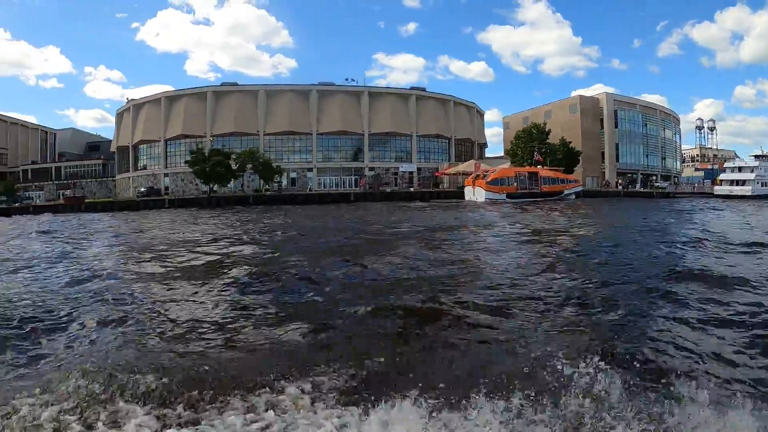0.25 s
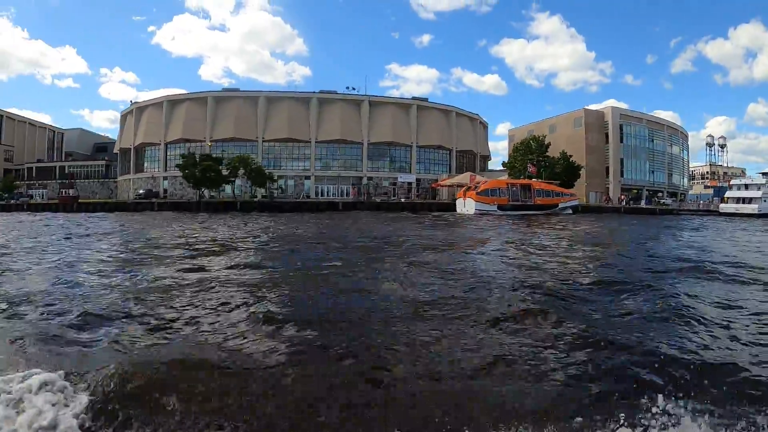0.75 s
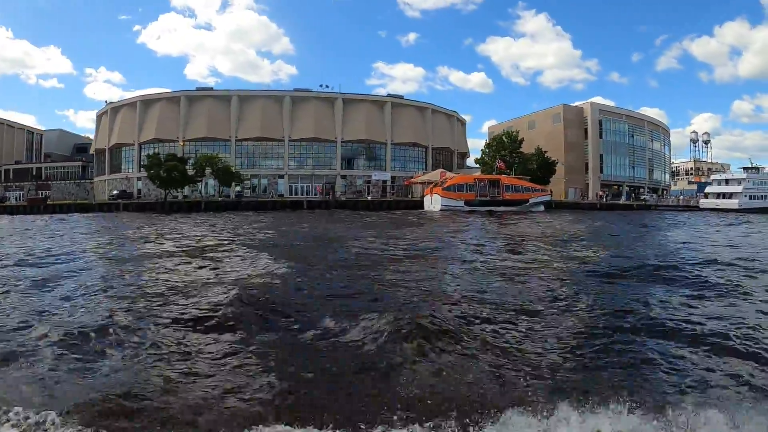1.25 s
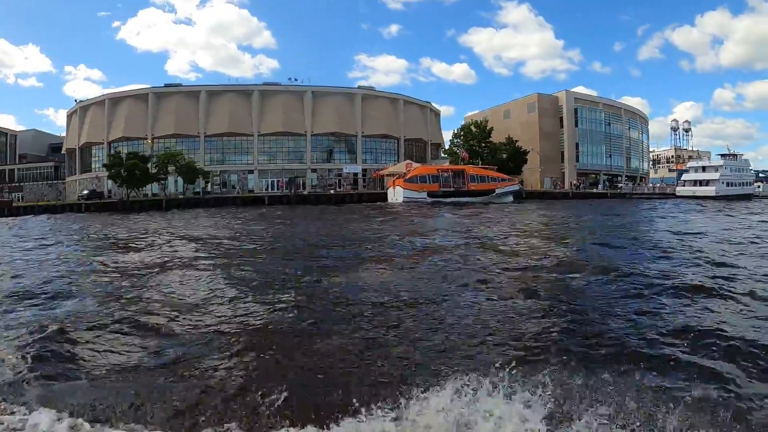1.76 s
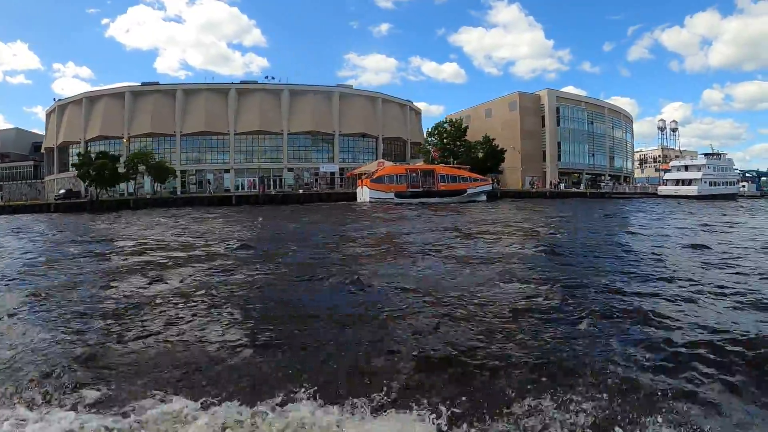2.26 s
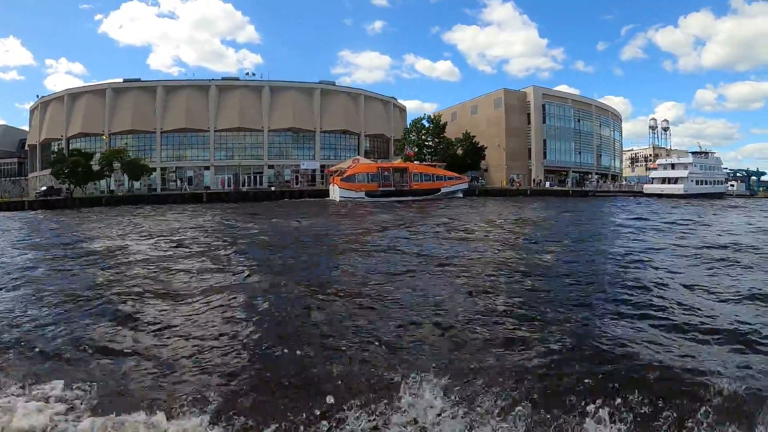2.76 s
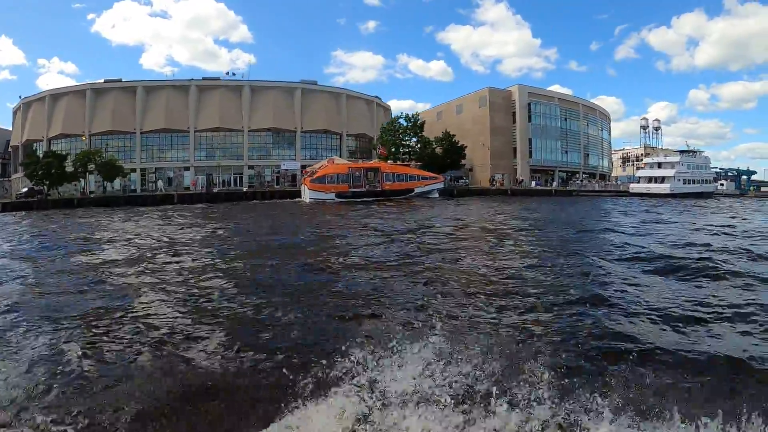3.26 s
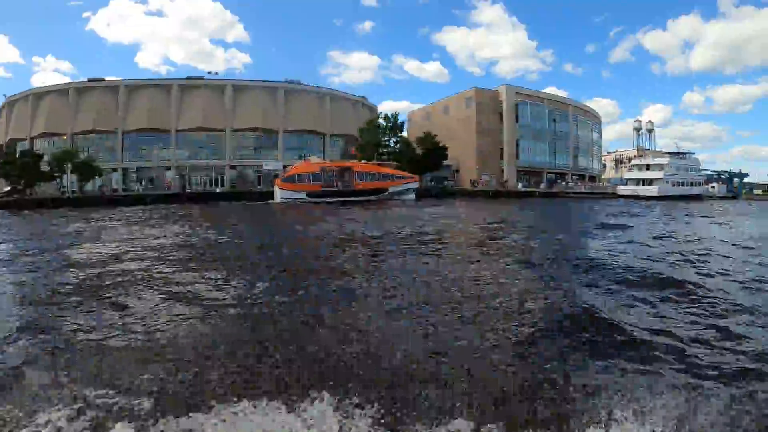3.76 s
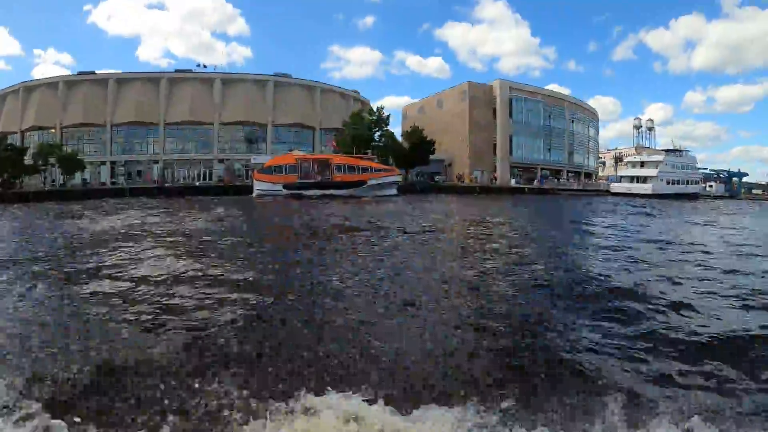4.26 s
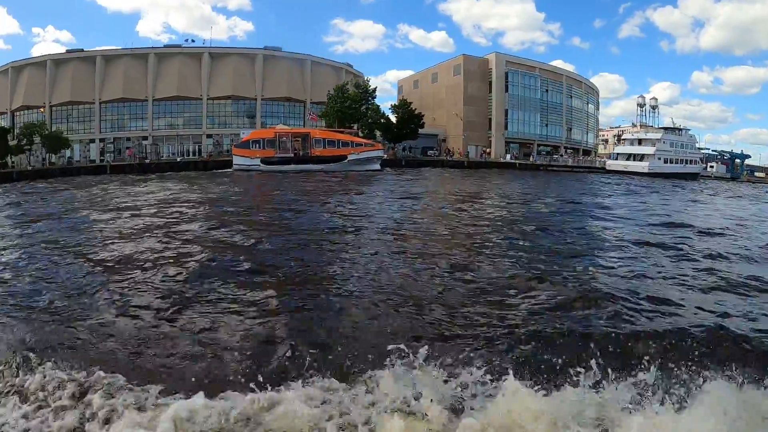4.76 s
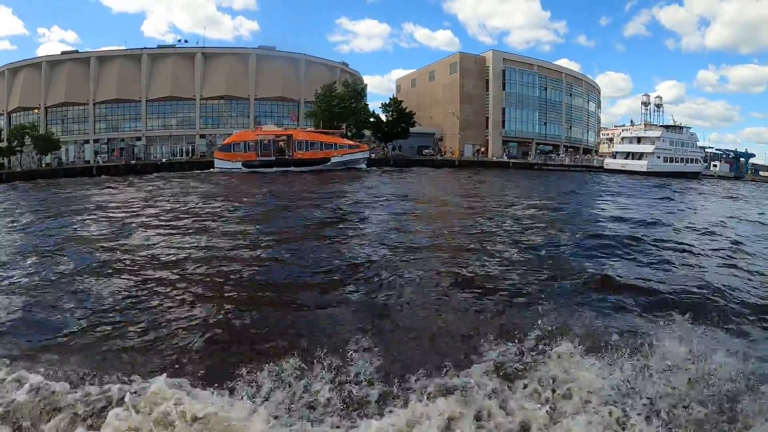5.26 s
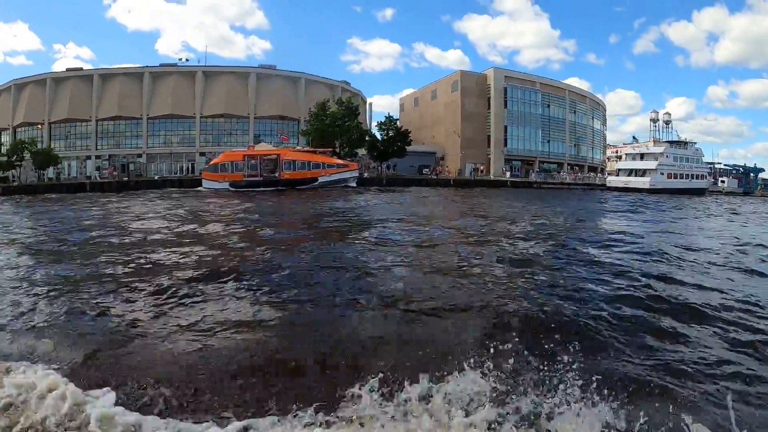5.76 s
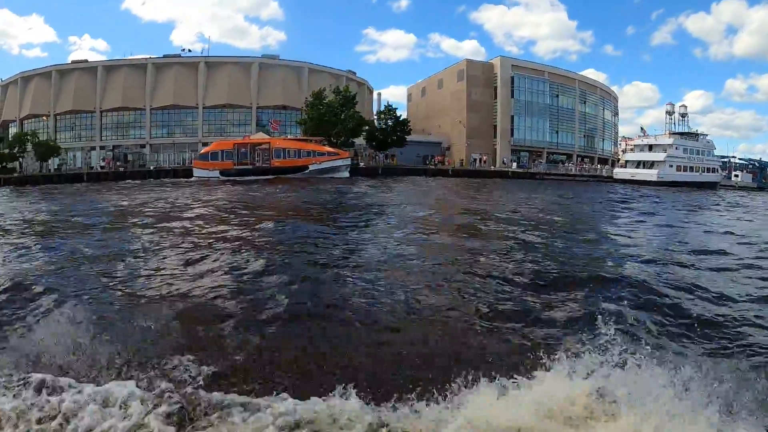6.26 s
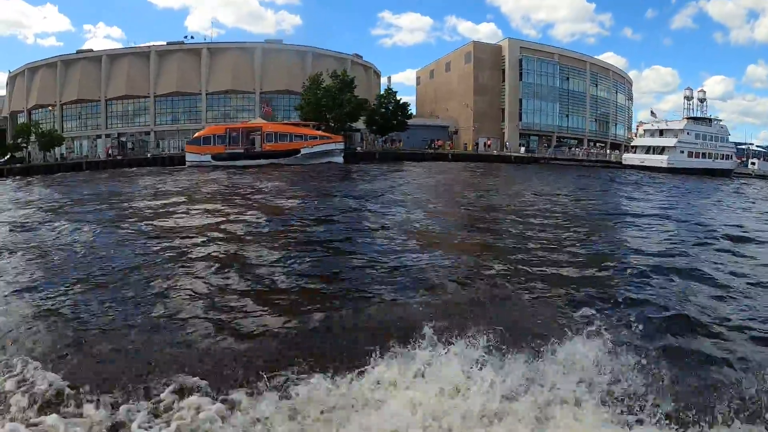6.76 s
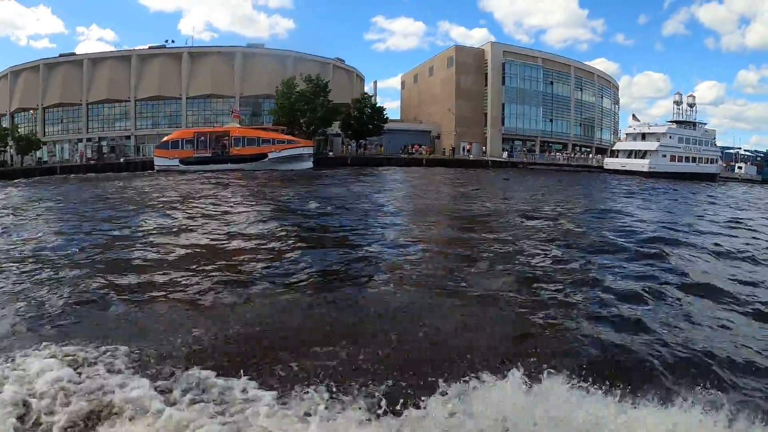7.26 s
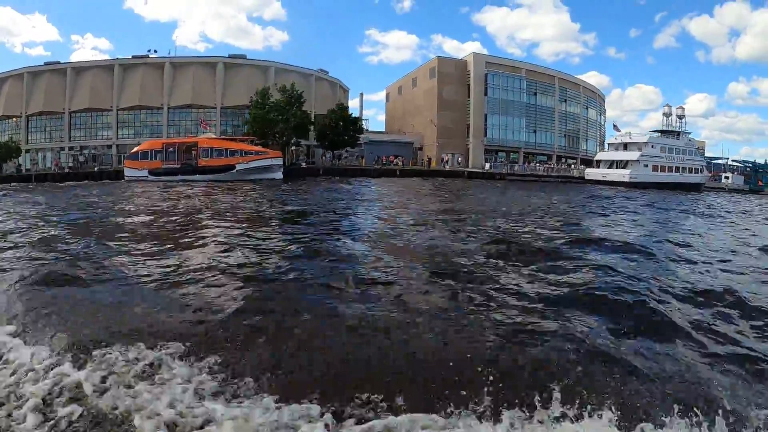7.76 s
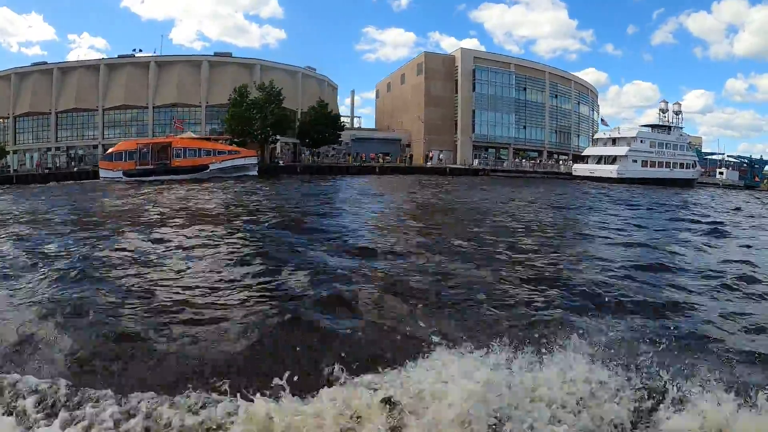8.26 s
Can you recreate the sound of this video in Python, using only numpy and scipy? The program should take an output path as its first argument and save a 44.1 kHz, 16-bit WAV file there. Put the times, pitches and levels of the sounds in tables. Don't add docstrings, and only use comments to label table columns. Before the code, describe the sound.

A small engine-driven watercraft is already cruising over choppy harbour water, heard close up from on board in mono. A deep, nearly pure impeller boom around 120 hertz dominates throughout, with weaker buzzing firing and shaking overtones that swell and fade. Water rushes over it in uneven surges, strong in the first half second with a wind gust, mostly midrange wash with softer hiss, droplet fizz and bubbling wake. Three short damped slaps hit the hull: a bright firm one at 1.6 seconds, a weak lower one at 1.9, a firm low one at 2.2. The drone sags slightly around 3.5, then rises a little in pitch from 5 to 6 while spray keeps surging. Gusts buffet near 5.2 and 6.9. After 6.5 the pitch eases down, splashes continue, and a last gust arrives near 8.5 as the ride carries on. The sound is muffled, slightly compressed and without echo.

```python
import sys
import numpy as np
from scipy import signal
from scipy.fft import rfft, irfft, next_fast_len
from scipy.io import wavfile
from scipy.ndimage import uniform_filter1d

SR = 44100
rng = np.random.default_rng(int(sys.argv[2]) if len(sys.argv) > 2 else 0)


def invert_db(level):
    return 10 ** (np.asarray(level, dtype=float) / 20)


def wav_record(signal):
    frames = np.transpose(np.atleast_2d(signal))
    bounded = np.clip(frames, -1, 1)
    quanta = np.round(bounded * 32767).astype(np.int16)
    wavfile.write(sys.argv[1], SR, quanta)


N = 375291
CRUISE_HZ = 122.5


def walk(rate):
    hold = int(SR / rate)
    levels = np.repeat(rng.standard_normal(N // hold + 1), hold)
    smooth = uniform_filter1d(uniform_filter1d(levels, hold), hold)[:N]
    return smooth / smooth.std()


def swells(table, column=2):
    t = np.arange(N) / SR
    total = 0
    for row in table:
        middle, length = row[:2]
        total = total + row[column] * np.cos(np.pi * np.clip((t - middle) / length, -.5, .5))
    return total


def bands(x, colour, count):
    size = next_fast_len(N)
    octave = np.log2(np.maximum(np.arange(size // 2 + 1) * SR / size, 1))
    hz, db = np.transpose(colour)
    knots = np.log2(hz)
    spectrum = rfft(x, size) * invert_db(np.interp(octave, knots, db, left=-90, right=-90))
    spectrum /= irfft(spectrum, size).std()
    centres = np.linspace(knots[0], knots[-1], count)
    spacing = centres[1] - centres[0]
    out = []
    for centre in centres:
        triangle = np.clip(1 - abs(octave - centre) / spacing, 0, 1)
        out.append((2 ** centre, irfft(spectrum * triangle, size)[:N]))
    return out


def line(crank, turns, db, waver, lag):
    size = np.sqrt(2) * invert_db(db + waver * walk(16))
    return size * np.cos(turns * crank + 0.38 * waver * walk(8) + lag)


# (time [s], blade rate [Hz])
SHAFT_SPEED = [(0.0, 124.8), (0.33, 125.5), (1.73, 121.8), (2.29, 121.7), (2.36, 120.7), (2.78, 122.8),
               (3.52, 120.6), (4.26, 121.1), (4.88, 122.7), (5.13, 124.9), (5.21, 124.6), (5.47, 125.9),
               (5.92, 124.9), (6.15, 125), (6.59, 123.4), (7.68, 121.2), (7.99, 119.6), (8.51, 120.2)]


def blade_rate():
    s, hz = np.transpose(SHAFT_SPEED)
    return np.interp(np.arange(N) / SR, s, hz)


def crank_angle():
    return 2 * np.pi * np.cumsum(blade_rate() * (1 + 0.0018 * walk(14))) / SR / 3 + np.pi / 6


# (middle time [s], length [s], rise [dB])
STERN_LIFTS = [(.15, 0.59, -1.5), (.79, 0.61, -2), (1.24, .2, -1), (1.73, .5, -1.1), (2.44, .19, -1.9),
               (2.71, .3, -1), (3.43, .5, -1.2), (4.11, .4, -.6), (5.17, 0.34, -1.5), (5.69, .38, -2),
               (6.06, 0.41, -2.5), (6.3, 0.15, -2), (6.94, 0.33, -1.5), (8.01, 0.5, -0.4)]
# (middle time [s], length [s], rise [dB])
SECOND_SWELLS = [(0.0, 0.42, 9.6), (0.54, 1.1, 14.8), (1.26, 0.79, 6.0), (1.78, 0.21, 9.9),
                 (2.35, 1.1, 16.1), (3.09, 0.33, 12.3), (3.56, 0.56, 8.9), (3.67, 0.17, 5.04),
                 (4.29, 0.39, 8.5), (5.02, 0.87, 10), (5.79, 0.88, 18), (6.24, 0.24, 12.5),
                 (6.86, 0.25, 10.2), (7.44, 0.76, 13.5), (8.22, 0.5, 11)]
# (middle time [s], length [s], rise [dB])
THIRD_SWELLS = [(1.69, 0.78, 8.8), (2.2, 0.49, 3.6), (2.82, 0.2, 5.8), (3.53, 1.17, 6.5),
                (4.26, 0.61, 11.2), (4.67, 0.34, 9.6), (5.42, 0.84, 3.18), (6.94, 0.37, 6.7),
                (6.96, 0.8, 1.7), (7.46, 0.4, 6.5), (7.95, 0.43, 7.4)]


def impeller(crank):
    boom_db = -12 + swells(STERN_LIFTS) + 0.19 * walk(4)
    boom = line(crank, 3, boom_db, 0.17, 0.003)
    second = line(crank, 6, -38.5 + swells(SECOND_SWELLS), 0.88, np.pi)
    third = line(crank, 9, -41 + swells(THIRD_SWELLS), 1.8, np.pi)
    return boom + second + third


# (middle time [s], length [s], rise [dB])
OUTLET_THIRD_SWELLS = [(0.02, 0.2, 11.0), (0.64, 0.81, 12), (1.84, 1.12, 7), (3.23, 1.11, 11.5),
                       (4.05, 0.64, 10), (5.21, 0.96, 2.9), (5.68, 0.89, 11.7), (6.44, 1.2, 9.0),
                       (7.29, 1.13, 11.3), (7.98, 0.44, 9.2), (8.49, 0.24, 11.5)]
# (middle time [s], length [s], rise [dB])
OUTLET_FIFTH_SWELLS = [(0.95, 0.68, 2.5), (1.74, 0.2, 7.4), (2.7, 0.63, 2.3), (3.61, 1.2, 7.5),
                       (4.18, 0.33, 5.6), (5.24, 0.57, 9.8), (5.7, 0.18, 5.0), (6.64, 1.1, 7),
                       (7.24, 0.26, 6.3), (7.97, 1, 8.8), (8.51, 0.3, 5.0)]


def exhaust(crank):
    third = line(crank, 4.5, -41 + swells(OUTLET_THIRD_SWELLS), 1.0, np.pi)
    fifth = line(crank, 7.5, -40.5 + swells(OUTLET_FIFTH_SWELLS), 1.3, np.pi / 2)
    return third + fifth


# (cycles per crank turn, level [dB rms])
SHAKE_LINES = [(1, -49.5), (1.5, -38.5), (2, -36.5), (4, -42), (5, -45.5), (8, -52.5), (10.5, -47.5),
               (12, -49.5), (18, -50.5), (19.5, -52)]


def crank_shake(crank):
    hz = blade_rate()
    faster_db = 1.0 * (hz - hz.mean())
    return sum(line(crank, turns, db + faster_db, 1.3, rng.uniform(0, 2 * np.pi)) for turns, db in SHAKE_LINES)


# (middle time [s], length [s], rise [dB])
WAKE_PILES = [
    (.03, 0.21, 1.8),
    (.5, 0.71, 1.2),
    (1.2, .5, 0.82),
    (2.15, 0.34, 1.8),
    (4.26, 0.65, 0.89),
    (6.22, .8, 1.4),
    (6.98, 0.24, 1.2),
    (7.85, .6, 1.3),
    (8.35, .3, 0.87),
]


def churn():
    speed_db = .2 * (blade_rate() - CRUISE_HZ)
    return speed_db + swells(WAKE_PILES) + 0.26 * swells(BOW_SURGES)


# (frequency [Hz], level [dB per Hz])
WATER_COLOUR = [(240, -26.5), (400, -3.5), (700, -5.5), (1200, -9), (2000, -12.5), (3200, -13.5),
                (4600, -19.5), (6300, -27.5), (7300, -28.5), (9500, -36.5), (11300, -41.5), (12500, -41.5),
                (14300, -48), (16500, -56)]
# (middle time [s], length [s], rise [dB], fine mist over spray [dB])
BOW_SURGES = [(0.0, 0.32, 6.2, -1.0), (0.31, 0.53, 4.7, 0.099), (0.57, 0.22, 1.4, 0.084),
              (0.73, 0.54, 1.3, -0.4), (1.02, 0.32, 2.5, 0.0), (1.32, 0.57, 3.5, 0.92),
              (1.78, 0.6, 2.5, 0.5), (2.17, 0.34, 1.5, -0.087), (2.43, 0.24, 2.0, 0.0),
              (2.73, 0.32, 3.0, -0.5), (2.89, 0.6, 1.0, 0.0), (3.08, 0.17, 2.5, 0.0),
              (3.38, 0.25, 2.3, 0.0), (3.63, 0.51, 2.3, 0.5), (3.8, 0.43, 2.0, -0.5), (4.25, 0.47, 3, -1.0),
              (4.62, 0.6, 3.8, 0.5), (4.95, 0.37, 1.3, 0.0), (5.29, 0.17, 2.8, -0.5), (5.36, 0.6, 2.8, 1.0),
              (5.81, 0.5, 3.8, -0.9), (6.03, 0.12, 2.8, 0.0), (6.39, 0.53, 4.0, 0.5),
              (6.96, 0.67, 4.0, 0.5), (7.37, 0.59, 1.0, 0.5), (7.69, 0.23, 4.6, 0.5),
              (8.08, 0.27, 3.0, -0.5), (8.44, 0.28, 4.1, 0.5)]
# (middle time [s], length [s], rise [dB])
SPRAY_LULLS = [
    (.2, .1, -0.5),
    (2.58, .12, -0.5),
    (3.2, .14, -0.5),
    (6.15, .14, -2.5),
    (6.65, .1, -1.5),
    (7.3, .08, -2),
]


def water():
    surge_db = swells(BOW_SURGES) + swells(SPRAY_LULLS)
    churn_db = 2.5 + churn()
    mist_db = (.95 - 1) * surge_db + swells(BOW_SURGES, column=3)
    hits = rng.random(N) < 2500 / SR
    sizes = invert_db(2.5 * np.minimum(rng.exponential(size=N), 4))
    drops = hits * sizes * rng.choice([-1, 1], N)
    rush = rng.standard_normal(N) + 0.3 * drops / drops.std()
    splutter = 0.6 * walk(11) + 0.68 * walk(25) + .5 * walk(70)
    out = 0
    for hz, band in bands(rush, WATER_COLOUR, count=12):
        low = np.clip(np.log2(1800 / hz), 0, 1)
        high = np.clip(np.log2(hz / 5000), 0, 1)
        tilt_db = low * (churn_db - surge_db) + high * mist_db
        flutter_db = (0.5 - .7 * low) * splutter + 0.4 * walk(12)
        out = out + band * invert_db(tilt_db + flutter_db)
    return out * invert_db(-34 + surge_db)


def bubbles():
    out, step = np.zeros(N + 512), np.arange(512)
    for where, pitch, size in rng.random((int(260 * N / SR), 3)):
        turns = 450 * 2 ** (2.6 * pitch) * step / SR
        ring = np.sin(2 * np.pi * turns * (1 + .03 * turns)) * np.exp(-turns / 1.7)
        start = int(where * N)
        out[start:start + 512] += ring * invert_db(-14 * size - 5 * pitch)
    return out[:N] / out.std() * invert_db(-41 + churn())


# (frequency [Hz], level [dB per Hz])
RUMBLE_COLOUR = [(18, -19), (30, -10), (50, -7), (72, -3.5), (100, 0.5), (145, 3), (190, -2), (230, -1.5),
                 (340, -3), (480, -16.5), (800, -30)]
# (middle time [s], length [s], rise [dB])
WIND_GUSTS = [
    (.19, 0.44, 6.2),
    (.9, 1.2, 2),
    (2.0, 0.46, 1.8),
    (4.45, 0.27, 2.2),
    (5.16, 0.33, 4.6),
    (6.0, .3, 3),
    (6.87, 0.32, 5),
    (7.43, .25, 3),
    (8.5, 0.38, 5.4),
]


def wind():
    speed_db = 0.1 * (blade_rate() - CRUISE_HZ)
    gust_db = speed_db + swells(WIND_GUSTS) + 0.9 * walk(12)
    out = 0
    for hz, band in bands(rng.standard_normal(N), RUMBLE_COLOUR, count=8):
        share = np.clip(np.log2(260 / hz), .2, 1)
        out = out + band * invert_db(share * gust_db + 1.0 * walk(5.4))
    return out * invert_db(-28.5)


# (time [s], peak level [dB], pitch [Hz])
HULL_SLAPS = [
    (1.611, -16, 582),
    (1.904, -24, 401),
    (2.179, -16, 446),
]


def slaps():
    out, t = np.zeros(N + SR), np.arange(SR // 20) / SR
    ring = np.exp(-t / .0022) * (1 - np.exp(-t / .0004))
    for s, db, hz in HULL_SLAPS:
        start = int(s * SR)
        out[start:start + len(t)] -= invert_db(db + 2.0) * np.sin(2 * np.pi * hz * t) * ring
    return out[:N]


def scene():
    crank = crank_angle()
    drive = impeller(crank) + exhaust(crank) + crank_shake(crank)
    return (drive + water() + bubbles() + wind() + slaps())[None]


def top_cut(x):
    return signal.sosfilt(signal.butter(12, 15720, fs=SR, output="sos"), x)


def record(dry):
    mix = np.tanh(.7 * dry) / .7
    return top_cut(mix)


dry = scene()
out = record(dry)
wav_record(out)
```